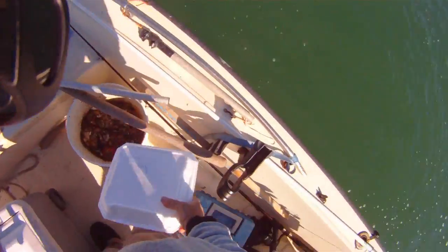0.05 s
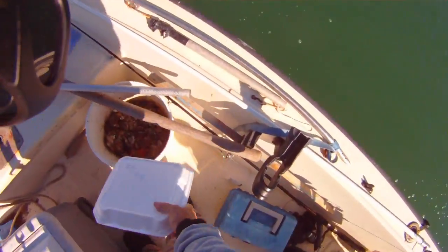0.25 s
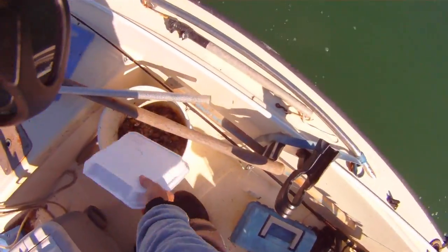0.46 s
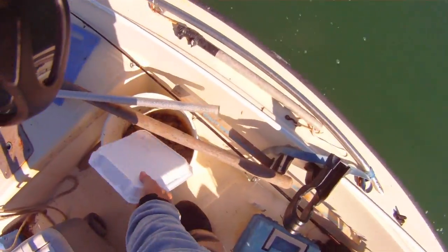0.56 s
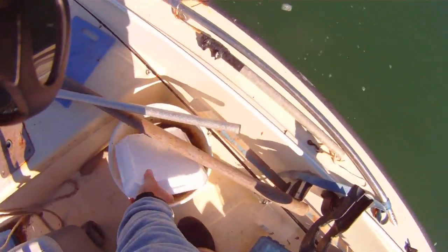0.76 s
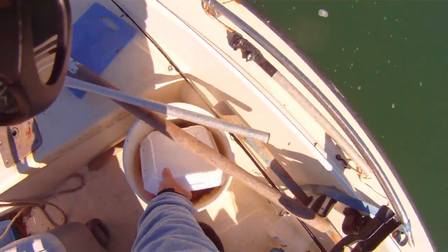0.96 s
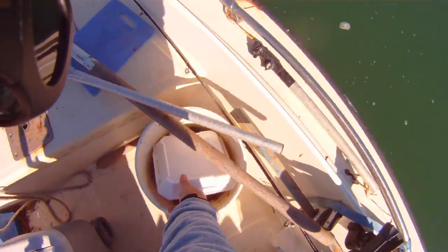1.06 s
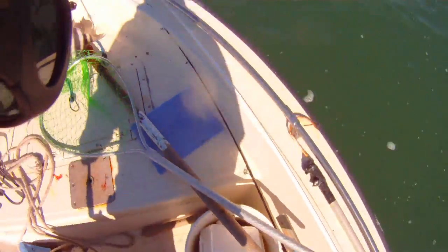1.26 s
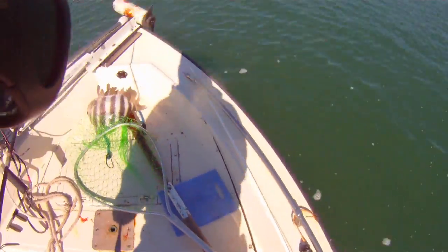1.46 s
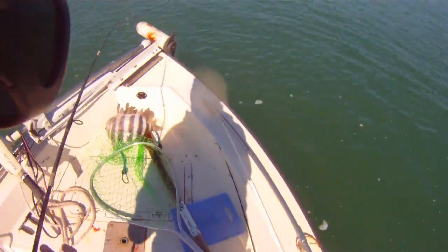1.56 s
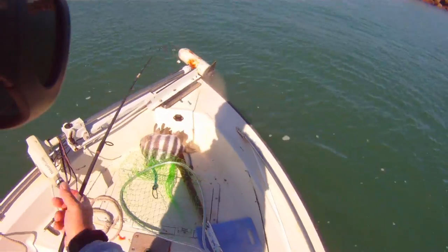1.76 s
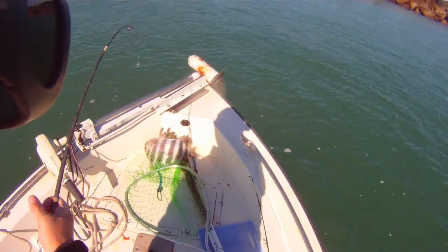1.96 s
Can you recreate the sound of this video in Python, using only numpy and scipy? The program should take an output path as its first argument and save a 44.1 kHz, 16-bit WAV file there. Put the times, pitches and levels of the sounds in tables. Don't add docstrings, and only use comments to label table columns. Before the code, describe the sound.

A foam box knocks and scrapes into a hollow tub on a small boat. A very hard, sharp tap at 0.23 s is followed by a boxy knock at 0.29. Gritty slides build from 0.65, with a hard tap at 0.82, a knock at 0.96 and squeaky scraping until 1.1. Faint ticks follow; wind puffs thump from 1.5. Water wash, hiss and a thin high whine continue throughout.

```python
import sys
import numpy as np
from scipy import signal
from scipy.fft import rfft, irfft
from scipy.io import wavfile
from scipy.ndimage import uniform_filter1d

SR = 44100
rng = np.random.default_rng(int(sys.argv[2]) if len(sys.argv) > 2 else 0)


def gain_from_db(level_db):
    decades = np.asarray(level_db, float) / 20
    return 10 ** decades


def bounce(signal):
    frames = np.transpose(np.atleast_2d(signal))
    limited = np.clip(frames, -1, 1)
    pcm = np.round(limited * 32767).astype(np.int16)
    wavfile.write(sys.argv[1], SR, pcm)


N = 88200
T = np.arange(N) / SR


def level(x, db):
    return x * gain_from_db(db) / np.sqrt(np.mean(x ** 2))


def curve(rows):
    return np.interp(T, *np.array(rows).T[:2])


def highpass(x, hz):
    return signal.sosfilt(signal.butter(2, hz, "high", fs=SR, output="sos"), x)


def colour(x, points):
    hz, db = np.array(points).T
    f = np.maximum(np.fft.rfftfreq(2048, 1 / SR), 1)
    cepstrum = irfft(np.log(gain_from_db(np.interp(np.log(f), np.log(hz), db))))
    cepstrum[1:1024] *= 2
    cepstrum[1025:] = 0
    return signal.fftconvolve(x, irfft(np.exp(rfft(cepstrum))))[:len(x)]


def rings(x, peaks):
    out = 0
    for k, (hz, width, db) in enumerate(peaks):
        out = out + (-1) ** k * gain_from_db(db) * signal.lfilter(*signal.iirpeak(hz, hz / width, SR), x)
    return out


def walk(rate):
    hold = int(SR / rate)
    steps = np.repeat(rng.standard_normal(N // hold + 1), hold)
    return 1.3 * uniform_filter1d(uniform_filter1d(steps, hold), hold)[:N]


def bands(points, flicker_db, rate, swell_db):
    noise = rfft(colour(rng.standard_normal(N), points))
    swell = walk(rate / 3)
    half_octave = np.log2(np.maximum(np.fft.rfftfreq(N, 1 / SR), 1)) * 2
    out = 0
    for k in range(8, 29):
        window = np.cos(np.pi / 2 * np.clip(half_octave - k, -1, 1)) ** 2
        out = out + irfft(noise * window, N) * gain_from_db(flicker_db * walk(rate) + swell_db * swell)
    return level(out, 0)


def grains(per_s, spread_db):
    clicks = (rng.random(N) < per_s / SR) * rng.standard_normal(N)
    return clicks * gain_from_db(spread_db * rng.exponential(size=N))


def wavelets(rows, sag_per_s):
    out = 0
    for (s, db, hz, width), phase in zip(rows, rng.random(len(rows))):
        t = T - s
        turns = hz * t * (1 - sag_per_s * np.clip(t, -.02, .02)) + phase
        out = out + gain_from_db(db) * np.exp(-.5 * (t / width) ** 2) * np.sin(2 * np.pi * turns)
    return out


# [f/Hz, level/dB]
RATTLE = [(200, -45), (500, -7), (1000, -9.5), (1600, 0), (3900, -7.5), (4600, -20.5), (6000, -33.5),
          (10000, -46.5)]


def rattle(x):
    return colour(x, RATTLE)


# [f/Hz, level/dB per Hz]
HISS = [(3000, -19), (5500, -2), (7000, -3.5), (10500, -5.5), (12500, -5.5), (15300, -8.5)]


def hiss():
    return level(colour(rng.standard_normal(N), HISS), -59.5)


WHINE_HZ, SLIP_TURNS = 7897.1, .53
FLIPS_PER_S, FIRST_FLIP_S, FLIP_S = 59.94, .0023, 0.0013


def whine():
    field = (T - FIRST_FLIP_S) * FLIPS_PER_S
    flip = np.clip((field % 1) / (FLIP_S * FLIPS_PER_S), 0, 1)
    slip = np.floor(field) + flip - field
    return level(np.sin(2 * np.pi * (WHINE_HZ * T + SLIP_TURNS * slip)), -53.5)


# [f/Hz, level/dB per Hz]
WIND = [(25, -21), (70, -4.5), (120, -4.5), (300, -6), (500, -11), (900, -20), (1500, -47)]
# [t/s, level/dB]
WIND_DB = [(1.3, -53), (1.38, -52), (1.48, -58), (1.57, -39), (1.67, -53), (1.78, -48), (1.83, -41),
           (1.9, -39.5), (1.94, -45.5), (2.0, -46)]
# [t/s, peak level/dB, f/Hz, length/s]
PUFFS = [(.205, -53, 76, 0.011), (1.38, -55, 155, 0.0072), (1.528, -31, 220, 0.0023),
         (1.56, -26.5, 290, 0.0023), (1.577, -26.5, 294, 0.002), (1.585, -32, 169, 0.0047),
         (1.602, -33, 180, 0.0038), (1.73, -56, 98.8, 0.028), (1.78, -34, 194, 0.0029),
         (1.821, -30, 287, 0.003), (1.832, -28.5, 403, .003), (1.869, -30, 225, 0.0027),
         (1.895, -37, 456, 0.0018), (1.906, -35, 308, 0.0019), (1.842, -33, 300, 0.0027),
         (1.948, -34.5, 128, 0.0028)]


def wind():
    fade_in = np.clip((T - 1.2) / 0.28, 0, 1)
    rumble = bands(WIND, 2.3, 45.0, 1.2) * gain_from_db(curve(WIND_DB)) * fade_in
    return rumble + wavelets(PUFFS, 4.7)


# [f/Hz, level/dB per Hz]
WASH = [(25, -29.5), (190, -12.5), (450, -6), (1500, -6.5), (2600, -7.5), (3900, -9.5), (4700, -23),
        (6000, -36)]
# [t/s, level/dB]
WASH_DB = [(0.0, -40.5), (0.68, -39), (0.89, -41.5), (1.03, -38.5), (1.69, -41.5), (2.0, -38)]
# [t/s, level/dB over the wash]
SPRAY_DB = [(0.0, -19), (1.2, -21), (1.6, -19.5), (2.0, -14)]
# [f/Hz, width/Hz, level/dB]
HOUSING = [(663, 56, -4.5), (1574, 104, 4.5), (2236, 130, -4.5), (3150, 420, -2.5)]


def wash():
    water = bands(WASH, 2.2, 13.4, 0.97)
    drops = level(rings(rattle(grains(2500, 1.5)), HOUSING), -4.5)
    spray = colour(rng.standard_normal(N), [(3000, -35), (4000, 1.5), (5300, -7), (6200, -21)])
    spray = level(spray * gain_from_db(6.0 * walk(120)), 0) * gain_from_db(curve(SPRAY_DB))
    return gain_from_db(curve(WASH_DB)) * (water + spray + drops)


# [t/s, peak level/dB, f/Hz, length/s]
FLECKS = [(.2932, -10, 2050, 0.00067), (.296, -11, 1640, 0.0011), (.4485, -27, 3000, .0004),
          (.694, -28, 1390, 0.00069), (.7195, -24, 3300, .0007), (.7265, -24, 3360, 0.00092),
          (.734, -35, 3900, 0.0018), (.757, -30, 1400, .002), (.774, -25, 2760, .0005),
          (.779, -31, 3300, .0006), (.799, -24, 2700, 0.00093), (.923, -31, 3940, .0015),
          (.989, -25, 3900, .001), (1.036, -21, 3420, .0012), (1.0485, -25, 3800, .0005),
          (1.0645, -20.5, 4130, .0006), (1.072, -26, 1700, 0.00068), (1.082, -32, 3600, 0.00084),
          (1.102, -32, 3900, 0.00071), (1.117, -39, 4390, .0005), (1.124, -34, 1600, 0.0009),
          (1.326, -32, 3600, 0.0017), (1.341, -32, 3900, .0012), (1.345, -29, 1800, .001),
          (1.356, -33, 3500, .001), (1.362, -32, 1700, 0.00085), (1.373, -28, 1600, 0.0011),
          (1.383, -35, 1550, 0.0013), (1.39, -30, 3680, .001), (1.4, -31, 1550, 0.0024),
          (1.413, -34, 1570, .002), (1.852, -44, 5100, .0006), (1.914, -28.5, 2050, 0.00092),
          (1.932, -33, 3720, .001), (1.934, -44, 5370, .0007), (1.95, -41, 3300, 0.00055),
          (1.97, -29, 2600, .0004), (1.9865, -27, 3600, 0.00032), (1.987, -35, 4900, 0.00064)]
# [t/s, peak level/dB, f/Hz, length/s]
GRIPS = [(.8235, -13, 3140, .0006), (0.66, -28, 3100, .0008), (1.051, -24, 790, .0015),
         (1.066, -24, 770, .0015), (1.041, -21.5, 2300, 0.0013), (1.003, -23, 2430, .0012),
         (1, -33, 1700, .001), (.986, -25, 860, .002), (.724, -29, 4000, 0.0014), (1.554, -32, 3500, .0006),
         (1.562, -29, 3800, 0.00065), (.978, -23, 4200, 0.00033), (.368, -31, 1800, 0.00093),
         (0.57, -33, 1900, .0007)]


def crackle():
    return wavelets(FLECKS, 3.5) + wavelets(GRIPS, 3.5)


TAP_CONTACT_S, KNOCK_CONTACT_S = 0.000501, 0.001475
TAP_TAIL_DB, KNOCK_TAIL_DB, TAIL_T60_S = -6.5, -3.5, 0.055


def hits(rows, modes, contact_s, tail_db):
    t = T[:8192]
    out = np.zeros(N + len(t))
    late = t - 2.188 * contact_s
    bell = np.exp(-.5 * (late / contact_s) ** 2)
    rise = np.clip(t / (2.24 * contact_s), 0, 1) ** 2
    for s, db, hz, ring_db in rows:
        blow = bell * np.sin(2 * np.pi * hz * late * (1 - 40 * late))
        ring = 0
        for (f, g, t60), (phase, detune) in zip(modes, rng.random((len(modes), 2))):
            turns = f * (1 + 0.028 * (detune - .5)) * t + phase
            ring = ring + gain_from_db(g) * np.sin(2 * np.pi * turns) * gain_from_db(-60 * t / t60)
        tail = level(rattle(rng.standard_normal(len(t))), tail_db) * gain_from_db(-60 * t / TAIL_T60_S)
        i = int(s * SR)
        out[i:i + len(t)] += gain_from_db(db) * (blow + gain_from_db(ring_db) * (ring + tail) * rise)
    return out[:N]


# [t/s, peak level/dB, contact f/Hz, ring level/dB]
TAPS = [
    (.2266, 1, 3495, -9),
    (.448, -25, 3300, -4.5),
    (1.199, -33, 3150, 3.5),
    (1.406, -24, 3980, -8.5),
    (1.416, -29, 4060, -10),
]
# [f/Hz, level/dB, t60/s]
TACKLE = [(1452, -15, 0.078), (1808, -8.5, 0.043), (2267, -2, 0.029), (3150, 0, 0.035), (3800, -6.5, 0.044),
          (4320, -7, 0.018), (4860, -26, 0.035), (5730, -25, 0.031), (8100, -53, 0.065), (9700, -46, 0.012)]
# [t/s, peak level/dB, contact f/Hz, ring level/dB]
RAIL_TAPS = [
    (.8115, -19, 3900, -8),
    (.82, -3.5, 3200, -7),
    (.977, -29, 4100, -14),
]
# [f/Hz, level/dB, t60/s]
RAIL = [(708, -17, 0.075), (1281, -15, 0.096), (1480, -13, 0.073), (1761, 1, 0.027), (3320, -10, 0.062),
        (3200, -23, 0.037), (3800, -4, 0.04), (3830, -13, 0.03), (4530, -37, 0.094), (5103, -51, 0.6)]


def taps():
    tackle = hits(TAPS, TACKLE, TAP_CONTACT_S, TAP_TAIL_DB)
    return tackle + hits(RAIL_TAPS, RAIL, TAP_CONTACT_S, TAP_TAIL_DB)


# [t/s, peak level/dB, contact f/Hz, ring level/dB]
KNOCKS = [
    (.292, -7, 1767, -5.5),
    (.367, -32, 1700, -1.5),
    (.374, -25, 1600, 0),
    (.957, -8.5, 1800, -6),
    (1.243, -27, 1630, -16),
]
# [f/Hz, level/dB, t60/s]
TUB = [(487, 0.5, 0.035), (706, -16.5, 0.11), (885, -4, 0.036), (1180, -11.5, 0.047), (1560, 6.5, 0.032),
       (1813, -7, 0.079), (2156, 10.5, 0.014), (2850, -7, 0.022), (3600, -18, 0.023)]


def knocks():
    dull = signal.butter(1, 2500, fs=SR, output="sos")
    return signal.sosfilt(dull, hits(KNOCKS, TUB, KNOCK_CONTACT_S, KNOCK_TAIL_DB))


# [t/s, peak level/dB, f/Hz, length/s]
CATCHES = [(.138, -33, 2400, 0.0022), (.238, -16, 3670, 0.0014), (.2945, -23, 3600, 0.00056),
           (.45, -24.5, 1660, 0.00081), (.545, -39.5, 4530, 0.0013), (.595, -31.5, 3240, .001),
           (.663, -27.5, 1040, 0.0013), (.69, -30, 3200, 0.0013), (.709, -29, 3300, 0.0038),
           (.719, -30.5, 1800, 0.0046), (.783, -29.5, 840, 0.0055), (.787, -32, 1800, 0.0056),
           (.942, -28, 3900, 0.0059), (1.008, -19, 1350, 0.0018), (1.017, -20, 3290, 0.0022),
           (1.054, -20, 1156, 0.0023), (1.061, -24.5, 3770, 0.0013), (1.583, -25, 666, 0.00089),
           (.961, -16, 2820, 0.00093)]


def catches():
    return wavelets(CATCHES, 1.7)


# [start t/s, peak t/s, end t/s, level/dB, brightness level/dB]
SLIDES = [(.39, 0.455, 0.45, -40.5, -1), (0.546, 0.59, 0.64, -49, 2), (0.652, .665, 0.79, -38, 2),
          (0.675, .695, 0.74, -34.5, 2), (.713, 0.729, 0.748, -26.5, -1), (0.765, 0.783, 0.83, -29.5, 6),
          (0.82, 0.91, 1.1, -37, 4), (0.922, 0.932, 0.975, -30, 3.5), (0.975, 0.982, 1.007, -25.5, -0.5),
          (0.986, 1.02, 1.091, -23, 0.5), (1.045, 1.058, 1.074, -21.5, 6), (1.066, 1.081, 1.13, -28.5, -3),
          (1.235, 1.38, 1.54, -39, 4), (1.547, 1.559, 1.65, -40, 0)]
# [f/Hz, level/dB per Hz]
BOX = [(230, -25.5), (750, -2), (1700, -1), (2600, -4.5), (3900, -3), (5600, -27.5), (7200, -21.5),
       (10000, -25), (12500, -39.5)]
# [f/Hz, width/Hz, level/dB]
BOX_RINGS = [(790, 96, 1.5), (1350, 91, 8.5), (1800, 42, 8), (2400, 170, -27), (3300, 200, 3),
             (3900, 260, 9.5), (7200, 500, -2)]


def slides():
    sticks = grains(9000, 1.5)
    scrape = level(colour(sticks, BOX), -9.5) + bands(BOX, 2.8, 150, 0.61)
    body = scrape + level(rings(rattle(sticks), BOX_RINGS), -3)
    body = level(highpass(body, 200), 0)
    treble = highpass(body, 2600)
    out = 0
    for start, peak, end, db, bright_db in SLIDES:
        bend = np.where(T < peak, .8, 1.6)
        swell = np.interp(T, [start, peak, end], [0, 1, 0]) ** bend
        out = out + swell * gain_from_db(db) * (body + (gain_from_db(bright_db) - 1) * treble)
    return out


def scene():
    blows = highpass(taps() + knocks(), 280)
    return (wind() + wash() + crackle() + blows + catches() + slides())[None]


def roll_off(x):
    return signal.sosfilt(signal.butter(12, 15930, fs=SR, output="sos"), x)


def record(dry):
    overload = .97
    mix = np.clip(dry + hiss() + whine(), -overload, overload)
    top_cut = signal.ellip(10, .2, 60, 15350, fs=SR, output="sos")
    mix = signal.sosfilt(top_cut, mix)
    return roll_off(mix)


dry = scene()
out = record(dry)
bounce(out)
```